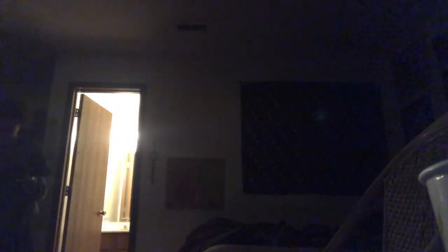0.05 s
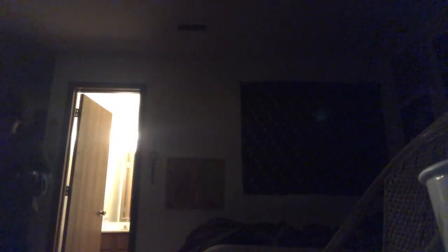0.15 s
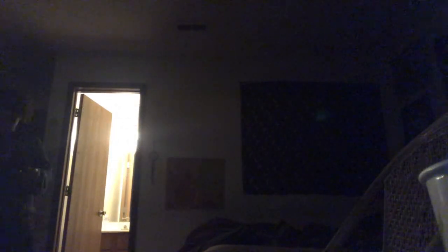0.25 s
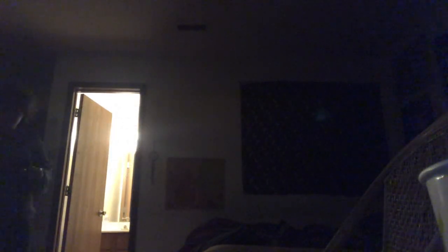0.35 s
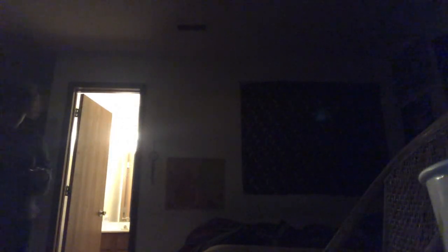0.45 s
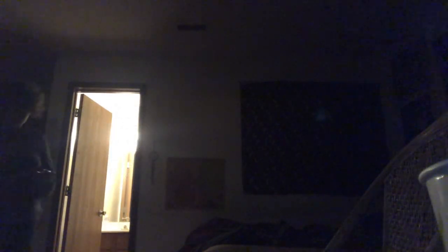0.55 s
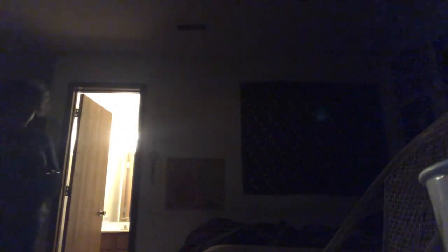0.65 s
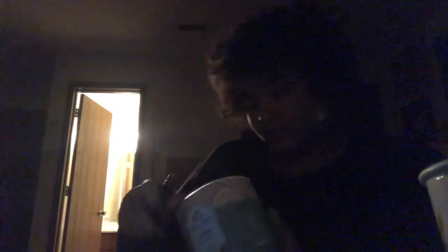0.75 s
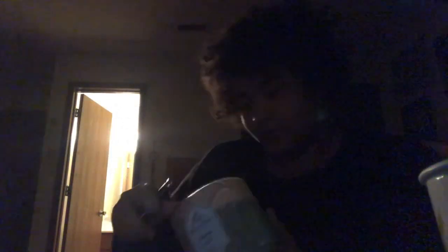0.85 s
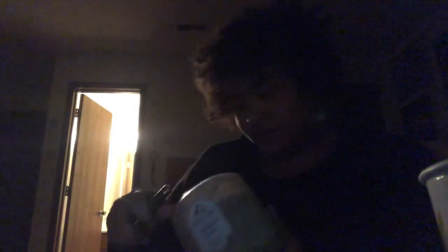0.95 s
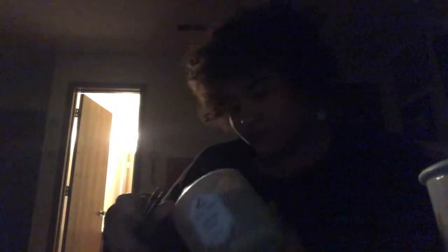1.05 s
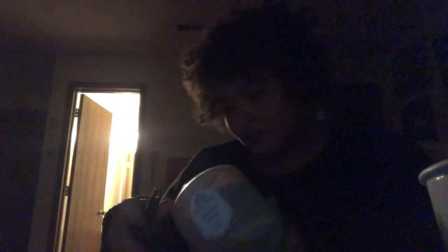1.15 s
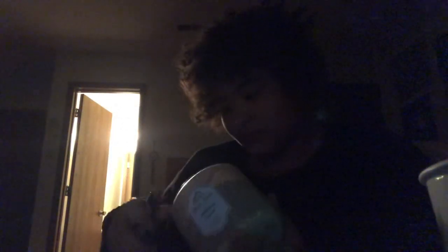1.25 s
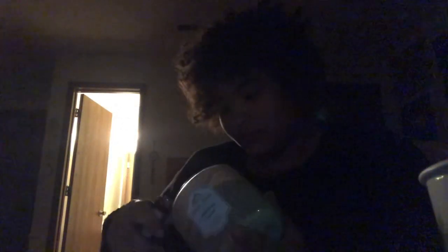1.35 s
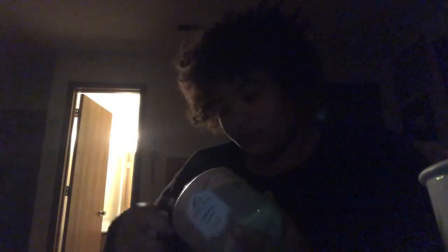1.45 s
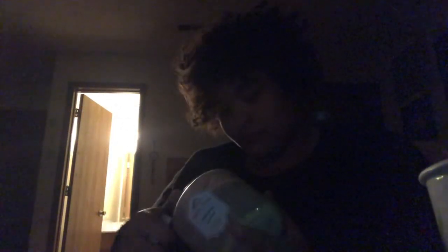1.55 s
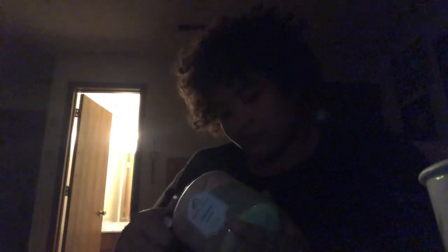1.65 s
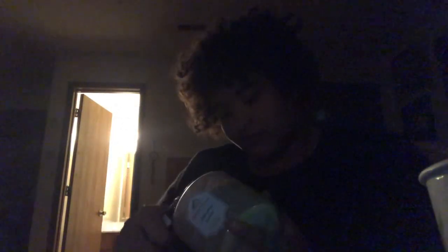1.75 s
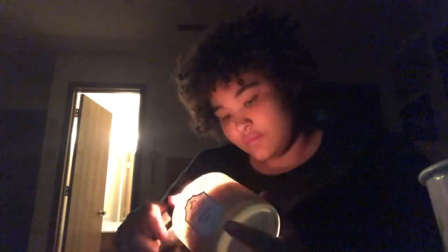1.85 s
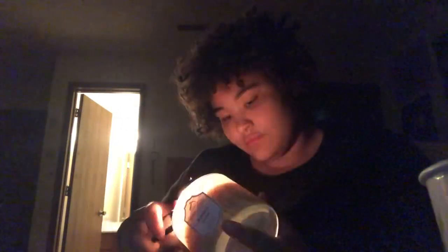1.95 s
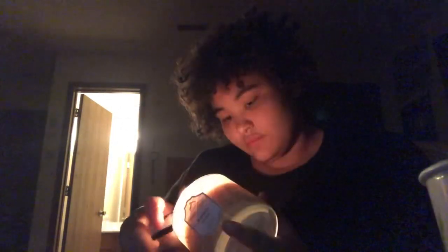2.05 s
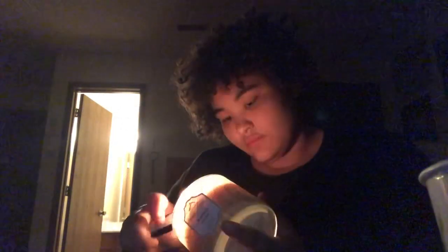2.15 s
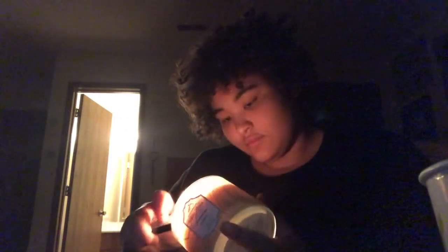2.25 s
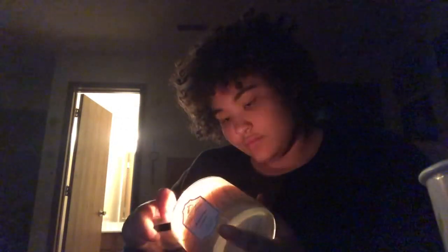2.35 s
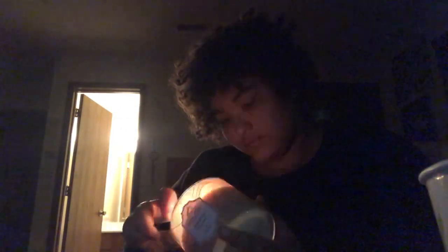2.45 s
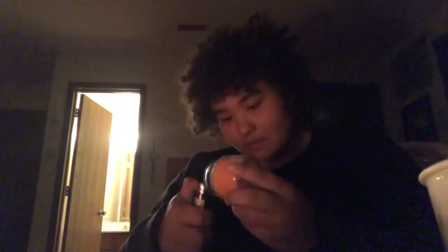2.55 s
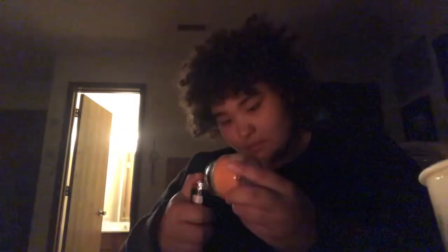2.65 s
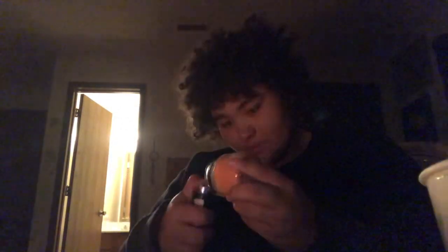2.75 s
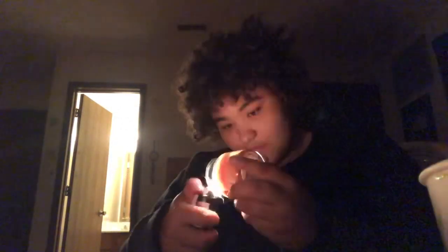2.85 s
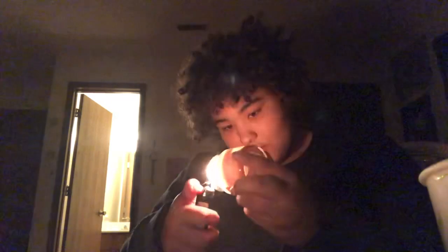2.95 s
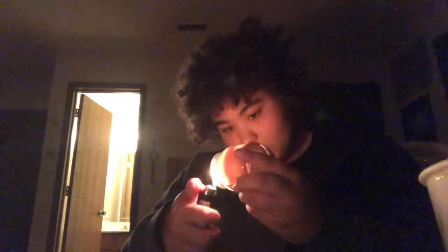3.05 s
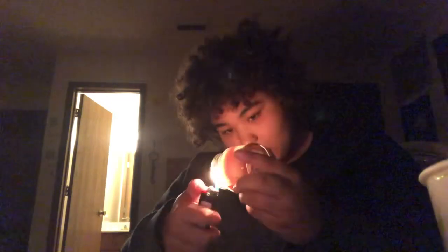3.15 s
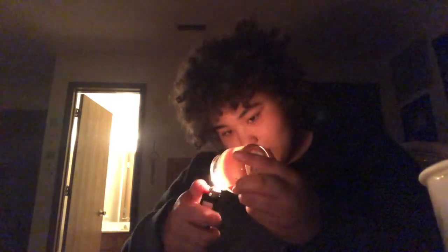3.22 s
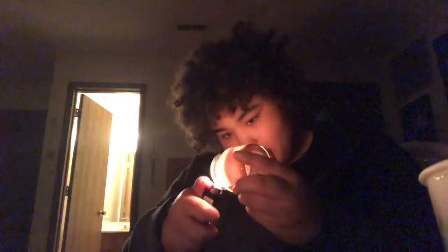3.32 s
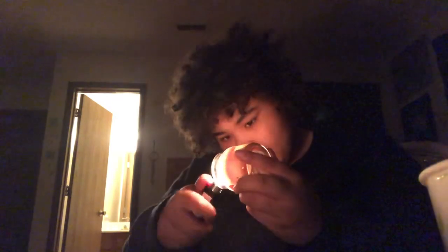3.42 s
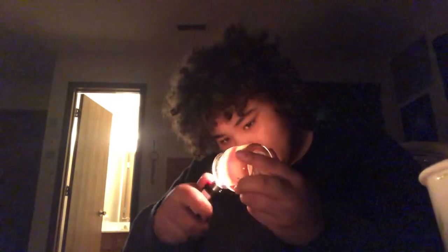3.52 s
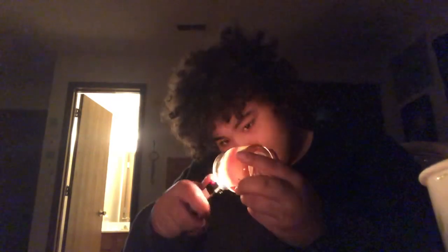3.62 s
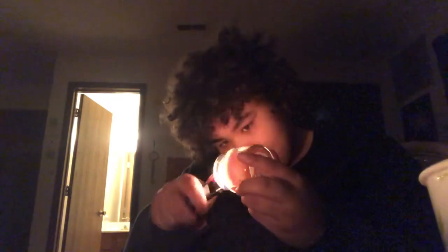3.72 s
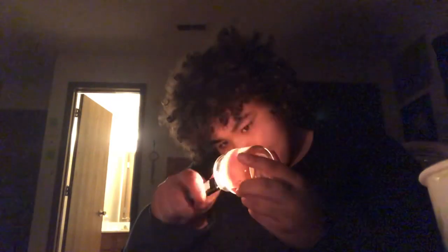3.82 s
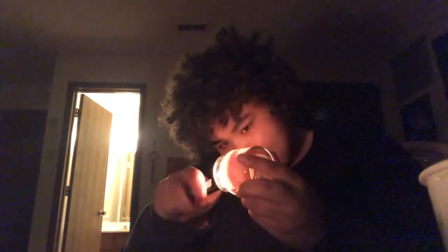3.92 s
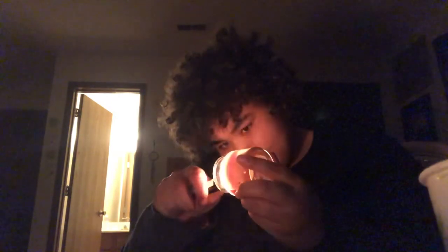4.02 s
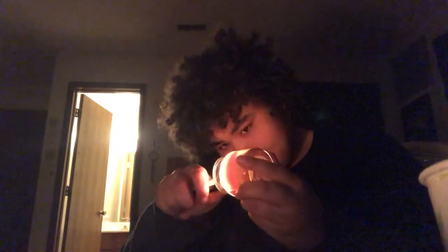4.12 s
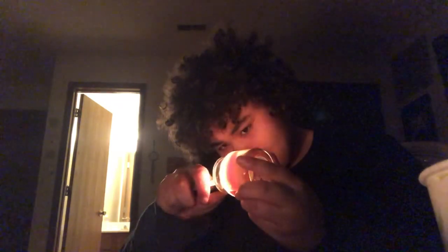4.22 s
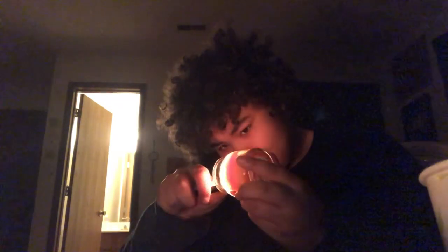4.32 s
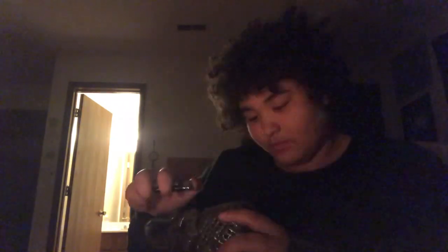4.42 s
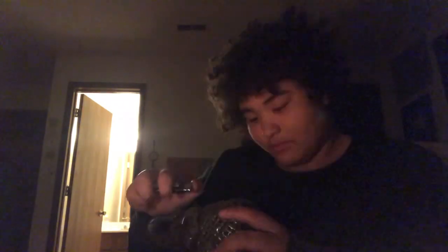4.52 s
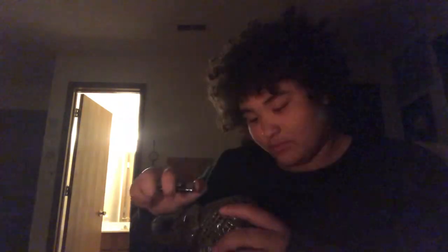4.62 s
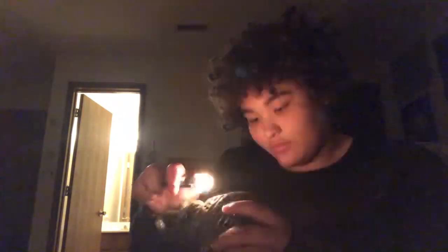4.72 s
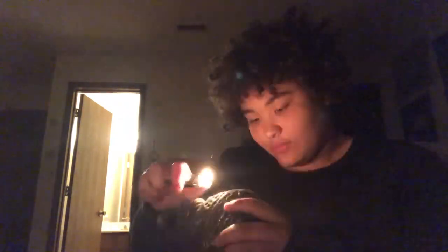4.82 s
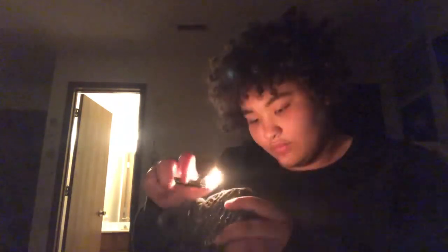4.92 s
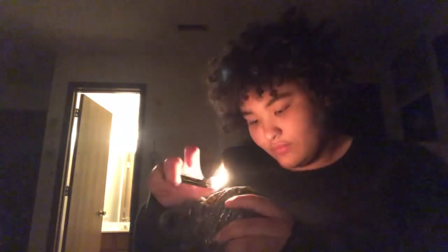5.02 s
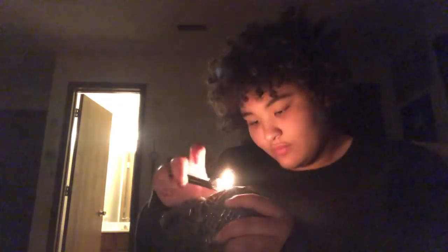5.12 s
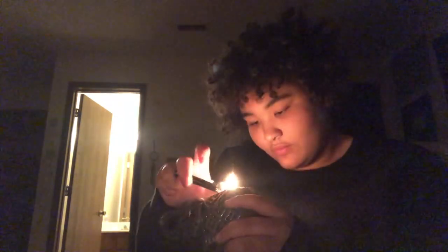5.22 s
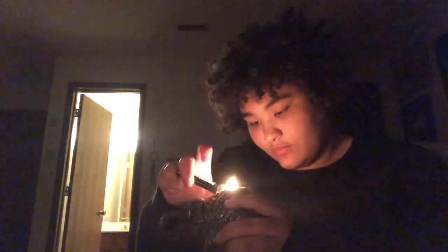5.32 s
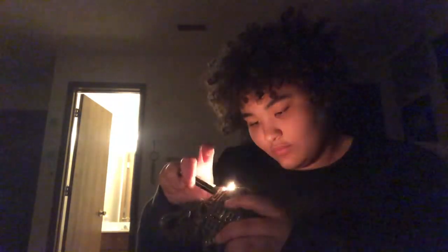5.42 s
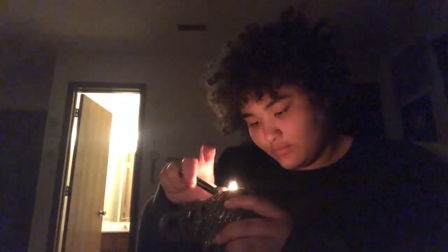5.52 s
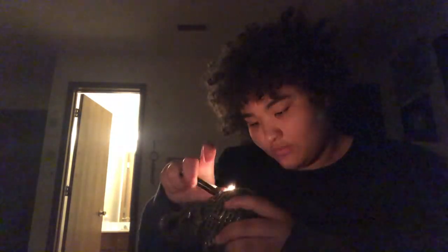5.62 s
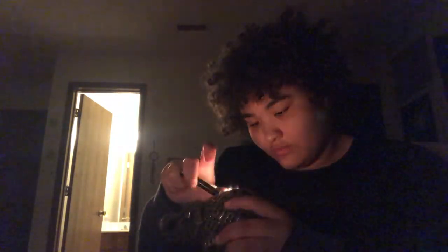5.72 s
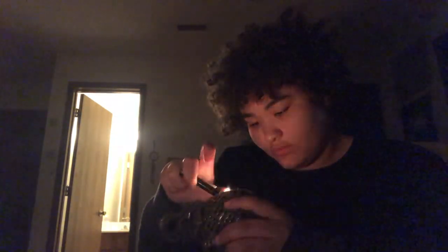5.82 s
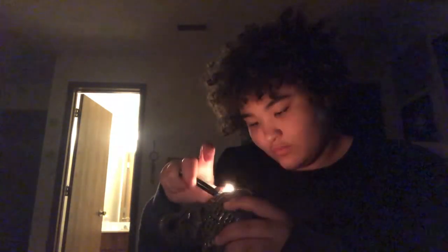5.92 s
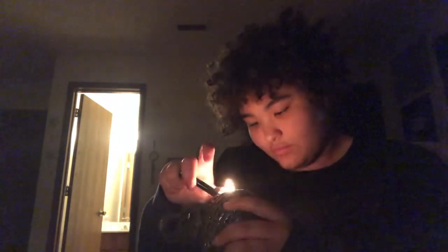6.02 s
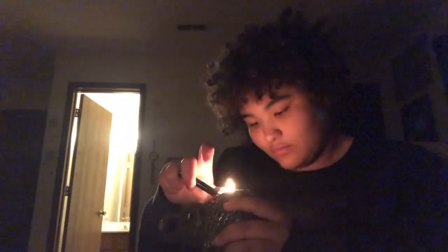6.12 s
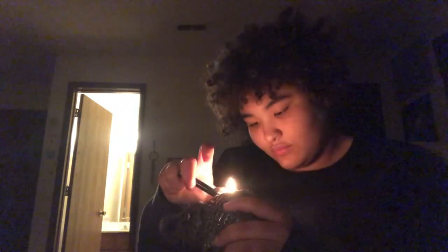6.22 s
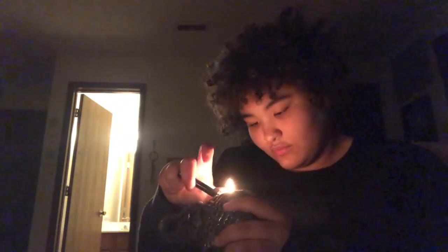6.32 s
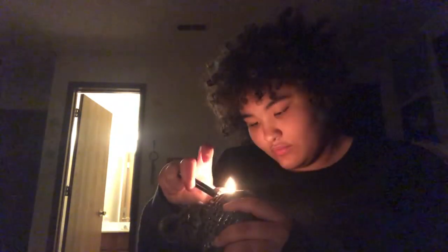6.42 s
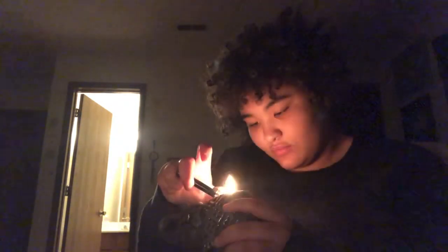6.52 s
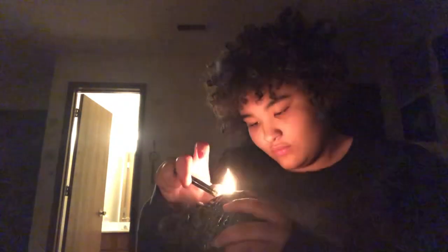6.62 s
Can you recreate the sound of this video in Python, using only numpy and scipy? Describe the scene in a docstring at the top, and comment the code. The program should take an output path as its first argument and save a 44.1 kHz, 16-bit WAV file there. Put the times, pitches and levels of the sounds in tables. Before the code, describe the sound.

In a small, quiet bedroom, sleeves swish faintly and hands rub on a hollow glass candle jar. A flint lighter is flicked with a sharp, raspy snap, then knocks lightly against the glass. Two more flicks follow, with tiny ticks as the lighter shifts in the hand. The sounds are close to the microphone, with a short room tail over faint rumble and hiss.

```python
"""A small, quiet bedroom, where candles are lit with a flint lighter. Sleeves swish and hands rub softly
on hollow glass jars. The spark wheel is flicked three times: a rasp, a snap of teeth on flint, a thumb
thud and a faint puff of gas. The lighter knocks once on a jar and ticks in the hand, all with a short
room tail. Underneath sits a bed of low rumble, faint hiss and thin whine; three times the whole mix
dips briefly and the bed returns at a slightly new level."""
import sys
import numpy as np
from scipy import signal
from scipy.fft import rfft, irfft
from scipy.io import wavfile

SR = 44100
rng = np.random.default_rng(int(sys.argv[2]) if len(sys.argv) > 2 else 0)


def unload_wav(signal):
    """Save mono or channel-first audio to the path in sys.argv[1] as 16-bit WAV at rate SR, clipped to [-1, 1]."""
    wavfile.write(
        sys.argv[1],
        SR,
        np.round(np.clip(np.atleast_2d(signal).T, -1, 1) * 32767).astype(np.int16),
    )


N = 294147
TIME = np.arange(N) / SR

# stretches of the background bed: (start [s], rumble level [dB], hiss level [dB])
BED_LEVELS = [(0, -66.5, -73), (.803, -65, -73), (2.6, -68.5, -74.5), (4.505, -65.5, -73)]
# tone of the room rumble: (frequency [Hz], relative level [dB])
RUMBLE_SPECTRUM = [(20, -51), (35, -21.5), (55, -2), (85, 0.5), (115, -5.5), (190, -9), (350, -12),
                   (650, -17), (1200, -18), (2000, -26), (4000, -37), (9000, -57)]
# tone of the hiss: (frequency [Hz], relative level [dB])
HISS_SPECTRUM = [(200, 1), (1500, 3), (2500, 2.5), (4400, 0), (6000, -1.5), (8000, -3), (11000, -5.5),
                 (16000, -6)]
# cloth swishes, one per arm move: (peak time [s], length [s], level [dB], low cut [Hz], high cut [Hz])
CLOTH_SWISHES = [(0.012, 0.11, -68.5, 1060, 4500), (0.246, .125, -61.5, 1040, 5700),
                 (0.595, 0.077, -61.5, 1080, 2560), (1.363, .3, -76.5, 1500, 11000),
                 (1.58, 0.053, -75, 3000, 14000), (2.68, 0.028, -69, 2600, 6000),
                 (4.332, 0.19, -77, 1696, 2366)]
# hands shifting on the jars: (peak time [s], length [s], level [dB])
HAND_RUBS = [(0.281, 0.057, -63.5), (0.648, .15, -67.5), (1.35, 0.58, -67), (2.17, 0.36, -67),
             (2.696, 0.095, -68), (3.729, 0.51, -66.5), (4.779, 0.44, -68.5)]
# hollow resonances of a jar: (frequency [Hz], bandwidth [Hz], gain [dB])
JAR_HOLLOW = [(240, 52, -3), (336.8, 58, 3.5), (506, 160, -2.5)]
# flicks of the wheel: (time [s], snap [dB], rasp [dB], thud [dB], gas puff [dB],
# low grip resonance [Hz], its boost [dB], high grip resonance [Hz], its boost [dB])
WHEEL_FLICKS = [(1.9228, 0.5, -8.5, 1, -51, 3293, 3.5, 10800, 6),
                (2.9522, 2, -11, -2.5, -62, 4450, 7, 9940, 3.5),
                (4.6893, 2.5, -13.5, -5, -46.5, 5620, 5, 8400, 9.5)]
# resonances of the lighter's wheel, hood and case: (frequency [Hz], bandwidth [Hz], gain [dB])
LIGHTER_MODES = [(1208, 180, -9), (2360, 230, -11), (2890, 380, -10.5), (3580, 500, -7), (4620, 410, -0.5),
                 (5800, 660, -4), (7340, 1000, -5), (8758, 480, -3), (9300, 800, -4.5), (10900, 1200, -1.5),
                 (13000, 1800, -3), (14600, 1300, -6.5)]
# early reflections off nearby surfaces: (delay [s], level [dB])
EARLY_ECHOES = [(.0037, -24), (.0083, -23.5), (0.016, -24)]
# tone of the room tail: (frequency [Hz], relative level [dB])
TAIL_SPECTRUM = [(60, 9), (150, 6.5), (330, 9), (700, 4.5), (1500, 5), (3000, 4), (4700, 2.5), (7000, 2),
                 (10000, -2), (15000, 1.5)]
# decay of the room tail: (frequency [Hz], T60 [s])
TAIL_DECAY = [(100, .35), (400, 0.25), (1500, 0.26), (5000, 0.24), (10000, 0.22), (16000, 0.18)]
# lighter against the jar: (time [s], level [dB])
JAR_KNOCKS = [(2.2470, -32.5)]
# partials of the struck glass: (frequency [Hz], relative level [dB], T60 [s])
GLASS_MODES = [(981, -4.5, 0.062), (1013, -3, 0.06), (1130, -7, 0.06), (1300, -4, 0.044),
               (1337, -2.5, 0.029), (2003, -10.5, 0.17), (3370, -16, 0.074), (5020, -19, 0.11),
               (7047, -27, 0.064), (7900, -20, 0.031), (9600, -39, 0.071), (12500, -28, .08),
               (13890, -34, .07)]
# lighter ticking in the hand: (time [s], level [dB], ring pitch [Hz], relative ring [dB], high cut [Hz])
LIGHTER_TICKS = [(2.659, -36, 3160, -26, 14500), (2.8908, -33, 1300, -22.5, 4300),
                 (3.378, -27.5, 4550, -16, 6000), (3.472, -39, 2750, -30, 3594),
                 (4.878, -43.5, 4470, -22, 5000), (5.375, -41, 2400, -12, 3500)]


def from_db(db):
    """Decibels to gain."""
    return 10 ** (np.asarray(db) / 20)


def rms_one(x):
    """Scale to rms 1."""
    return x / np.sqrt(np.mean(x ** 2) + 1e-20)


def energy_one(x):
    """Scale to the energy of a unit click."""
    return x / np.sqrt(np.sum(x ** 2) + 1e-20)


def at_hz(points, hz):
    """Read a curve on a log-frequency axis."""
    known_hz, values = np.transpose(points)
    return np.interp(np.log(np.maximum(hz, 1)), np.log(known_hz), values)


def noise(spectrum):
    """Steady noise of a given colour, rms 1."""
    gain = from_db(at_hz(spectrum, np.fft.rfftfreq(N, 1 / SR)))
    return rms_one(irfft(rfft(rng.standard_normal(N)) * gain, N))


def band(x, edges_hz, kind):
    """Second-order Butterworth filter."""
    return signal.sosfilt(signal.butter(2, edges_hz, kind, fs=SR, output="sos"), x)


def resonance(x, hz, width_hz):
    """Two-pole resonance, unity gain at the peak."""
    return signal.lfilter(*signal.iirpeak(hz, hz / width_hz, fs=SR), x)


def body(x, modes):
    """Broad resonances in parallel, polarity alternating."""
    return sum((-1) ** k * from_db(db) * resonance(x, hz, width_hz)
               for k, (hz, width_hz, db) in enumerate(modes))


def ring(t, hz, t60):
    """A struck mode dying away."""
    return np.sin(2 * np.pi * hz * t) * np.exp(-np.log(1000) * t / t60)


def whiten(x, evenness):
    """Flatten a burst's spectrum: 0 leaves its comb of peaks and gaps, 1 fills it."""
    spectrum = rfft(x)
    return irfft(spectrum / (abs(spectrum) + 1e-12) ** evenness, len(x))


def add(track, time_s, sound):
    """Drop a sound onto the track."""
    start = round(time_s * SR)
    track[start:start + len(sound)] += sound[:N - start]


def stroke(peak_s, length_s, rise_share=.5):
    """Envelope of a hand or arm move: it gathers speed, peaks and slows to rest."""
    width_s = length_s * np.where(TIME < peak_s, rise_share, 1 - rise_share)
    return np.exp(-.5 * ((TIME - peak_s) / width_s) ** 2)


def background_bed(whine_hz=5080, whine_width_hz=650, whine_db=-7):
    """Room rumble and microphone hiss with a narrow whine, stepping in level from stretch to stretch."""
    starts, rumble_db, hiss_db = np.transpose(BED_LEVELS)
    stretch = np.searchsorted(starts[1:], TIME)
    whine = resonance(rng.standard_normal(N), whine_hz, whine_width_hz)
    whine = resonance(whine, whine_hz, whine_width_hz)
    hiss = noise(HISS_SPECTRUM) + from_db(whine_db) * rms_one(whine)
    return from_db(rumble_db)[stretch] * noise(RUMBLE_SPECTRUM) + from_db(hiss_db)[stretch] * hiss


def cloth_swishes(grain_db=1.0, fibre_db=-17, fibre_hz=4000):
    """Fibres slide over each other: grainy noise with an airy top, swelling with each arm move."""
    out = np.zeros(N)
    fibres = from_db(fibre_db) * rms_one(band(rng.standard_normal(N), fibre_hz, "high"))
    for peak_s, length_s, level_db, low_hz, high_hz in CLOTH_SWISHES:
        cloth = rms_one(band(rng.standard_normal(N), [low_hz, high_hz], "band"))
        out += from_db(level_db) * stroke(peak_s, length_s, rise_share=.28) * (cloth + fibres)
    grain = rms_one(band(rng.standard_normal(N), 410, "low"))
    return out * from_db(grain_db * grain)


def hand_rubs(resting_db=-78):
    """Skin stirs the jar's hollow resonances: faintly at rest, more with each shift of the grip."""
    rubbing = band(body(rng.standard_normal(N), JAR_HOLLOW), [170, 800], "band")
    shift_power = sum((from_db(db) * stroke(peak_s, length_s)) ** 2 for peak_s, length_s, db in HAND_RUBS)
    return np.sqrt(from_db(resting_db) ** 2 + shift_power) * rms_one(rubbing)


def flint_rasp(t, rise_s=.0035, drag_db=-17, drag_s=0.012, drag_hz=3700, squeak_hz=11900, squeak_db=-2):
    """The wheel drags ever faster over the flint, dull scrape into squeak, and breaks free at t = 0."""
    grit, grain = rng.standard_normal((2, len(t)))
    scrape = grit * np.sqrt(abs(grain)) * (t < 0)
    fast = scrape * np.exp(-abs(t) / rise_s)
    slow = scrape * np.exp(-abs(t) / drag_s) * from_db(drag_db)
    squeak = from_db(squeak_db) * resonance(fast + slow / 2, squeak_hz, width_hz=2200)
    return energy_one(body(fast, LIGHTER_MODES) + squeak + resonance(slow, drag_hz, width_hz=2800))


def wheel_snap(t, peak_s=0.00074, width_s=0.001268, rattle_db=-18, rattle_s=0.0032):
    """The teeth tear over the flint in about 2 ms, then the wheel rattles out."""
    tear = np.exp(-.5 * ((t - peak_s) / width_s) ** 2)
    rattle = from_db(rattle_db) * np.exp(-abs(t - peak_s) / rattle_s)
    return rng.choice([-1, 1], len(t)) * (tear + rattle) * (t >= 0)


def lighter_flicks(thud_hz=(60, 650), puff_hz=(45, 380), puff_s=0.025, snap_s=.012):
    """Rasp, snap, the thumb's thud on the lever and a puff of gas; returns direct sound and room send."""
    direct, room_send = np.zeros((2, N))
    t = TIME[:SR // 5] - .1   # pre-roll for the rasp
    thud = band(signal.unit_impulse(len(t)), thud_hz, "band")
    for time_s, snap_db, rasp_db, thud_db, puff_db, low_hz, low_db, high_hz, high_db in WHEEL_FLICKS:
        teeth = wheel_snap(t)
        rasp = from_db(rasp_db) * flint_rasp(t)
        puff = rms_one(band(rng.standard_normal(len(t)), puff_hz, "band")) * np.exp(-(t - t[0]) / puff_s)
        # in any one direction the tooth impacts comb-filter; the room gathers all directions
        for track, evenness in ((direct, 0.13), (room_send, 1)):
            snap = whiten(teeth, evenness) * np.exp(-abs(t) / snap_s)
            metal = from_db(snap_db) * energy_one(body(snap, LIGHTER_MODES)) + rasp
            # the cupped hand boosts other pitches on each flick
            for hz, boost_db, width_hz in ((low_hz, low_db, 800), (high_hz, high_db, 1000)):
                metal = metal + (from_db(boost_db) - 1) * resonance(metal, hz, width_hz)
            add(track, time_s + t[0], metal)
            add(track, time_s, from_db(thud_db) * thud + from_db(puff_db) * puff)
    return direct, room_send


def bedroom_reverb(send, wet_db=-12, build_s=.005):
    """A few early reflections, then a short diffuse tail whose top end dies first."""
    t = TIME[:SR // 2]
    hz = np.fft.rfftfreq(len(t), 1 / SR)
    diffuse = rfft(rng.standard_normal(len(t))) * from_db(at_hz(TAIL_SPECTRUM, hz))
    edges_hz = np.geomspace(30, SR / 2, 40)
    tail = 0
    for low, high in zip(edges_hz, edges_hz[1:]):
        t60 = at_hz(TAIL_DECAY, np.sqrt(low * high))
        band_noise = irfft(diffuse * ((hz >= low) & (hz < high)), len(t))
        tail = tail + band_noise * np.exp(-np.log(1000) * t / t60)
    attack = 1 - np.exp(-(t / build_s) ** 2)
    response = from_db(wet_db) * energy_one(tail * attack)
    for delay_s, echo_db in EARLY_ECHOES:
        add(response, delay_s, [from_db(echo_db)])
    return signal.fftconvolve(send, response)[:N]


def jar_knock(attack_s=0.00097, crack_db=-16, crack_s=0.0047, choke_at_s=0.092, choke_s=0.01):
    """The struck glass rings over a dry crack until the fingers choke it."""
    out, t = np.zeros(N), TIME[:SR // 2]
    envelope = (1 - np.exp(-t / attack_s)) * np.exp(-np.maximum(t - choke_at_s, 0) / choke_s)
    glass = envelope * sum(from_db(db) * ring(t, hz, t60) for hz, db, t60 in GLASS_MODES)
    for time_s, level_db in JAR_KNOCKS:
        crack = from_db(crack_db) * rng.standard_normal(len(t)) * np.exp(-t / crack_s)
        add(out, time_s, from_db(level_db) * (glass + crack))
    return band(out, 500, "high")


def lighter_ticks(contact_s=0.0018, edge_db=-19, ring_t60_s=0.029):
    """Lever and case touch: tiny clicks, each with a crisp edge and one ringing pitch."""
    out, t = np.zeros(N), TIME[:SR // 6]
    for time_s, level_db, ring_hz, ring_db, high_cut_hz in LIGHTER_TICKS:
        contact = rng.standard_normal(len(t)) * np.exp(-t / contact_s)
        click = energy_one(band(body(contact, LIGHTER_MODES), high_cut_hz, "low"))
        edge = from_db(edge_db) * energy_one(band(contact, 10000, "high"))
        ping = from_db(ring_db) * ring(t, ring_hz, ring_t60_s)
        add(out, time_s, from_db(level_db) * (click + edge + ping))
    return out


def scene():
    """Mono mix: lighter and jar with room reverb, over dry cloth, hands and the background bed."""
    flicks, flick_send = lighter_flicks()
    contacts = lighter_ticks() + jar_knock()
    room = bedroom_reverb(flick_send + contacts)
    return (flicks + contacts + room + cloth_swishes() + hand_rubs() + background_bed())[None]


def record(dry, lag_hz=230, lag_width_hz=480, fade_s=0.028, high_cut_hz=16000):
    """The microphone passes the bass a few ms late; the mix dips at each bed step and the top is cut."""
    for _ in range(3):   # all-pass stages: a click turns into a quick falling chirp
        dry = dry - 2 * resonance(dry, lag_hz, lag_width_hz)
    for start_s, _, _ in BED_LEVELS[1:]:
        dry = dry * np.clip(abs(TIME - start_s) / fade_s, .04, 1)
    return signal.sosfilt(signal.ellip(10, .2, 70, high_cut_hz, fs=SR, output="sos"), dry)


dry = scene()
out = record(dry)
unload_wav(out)
```